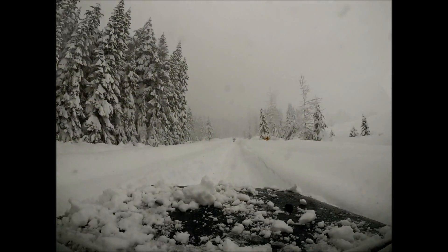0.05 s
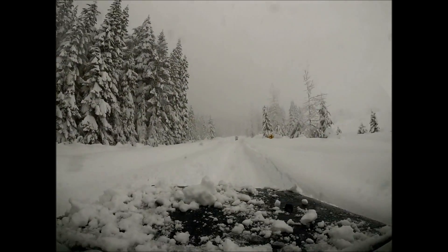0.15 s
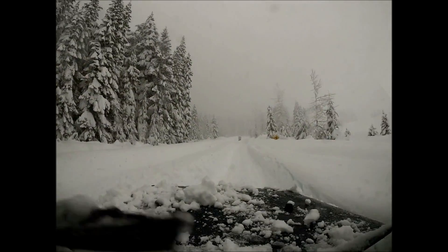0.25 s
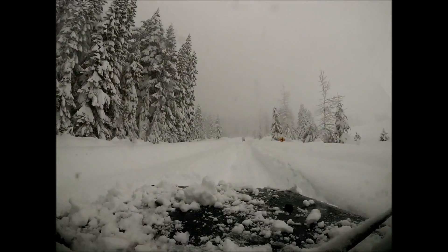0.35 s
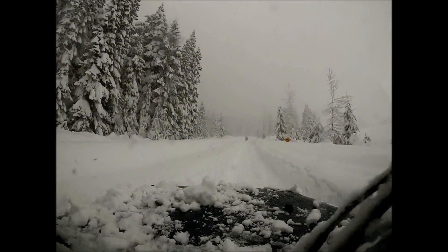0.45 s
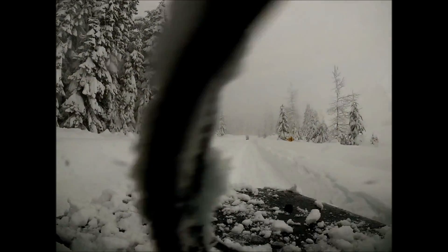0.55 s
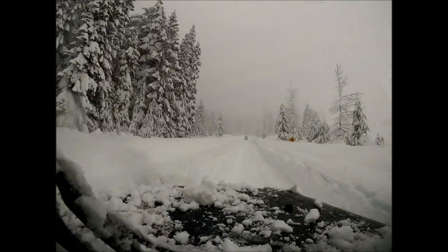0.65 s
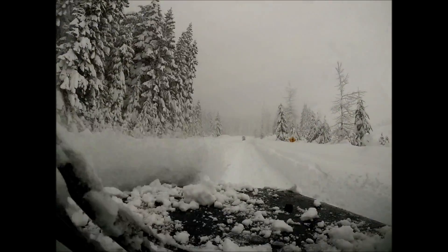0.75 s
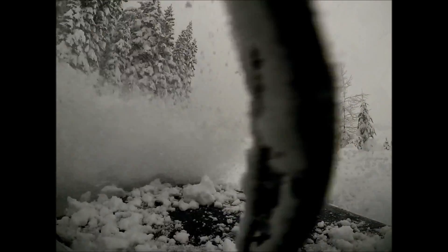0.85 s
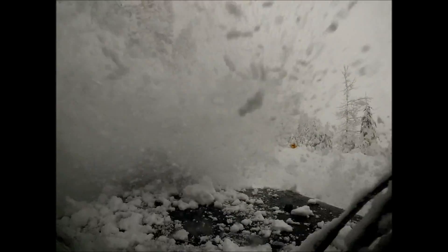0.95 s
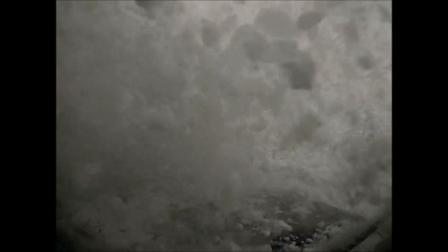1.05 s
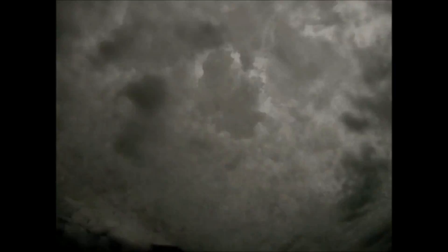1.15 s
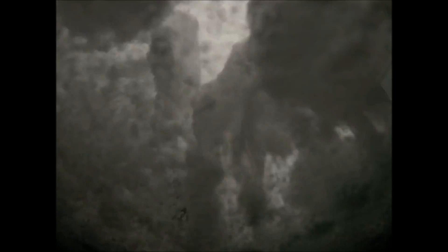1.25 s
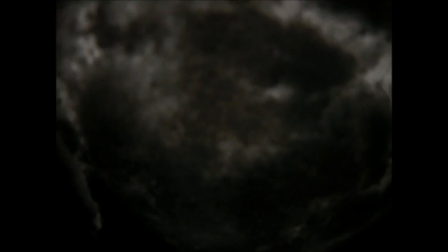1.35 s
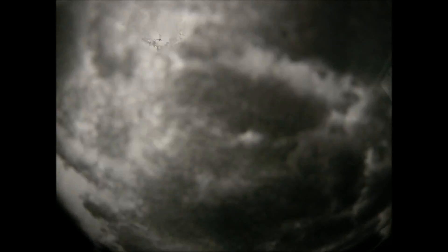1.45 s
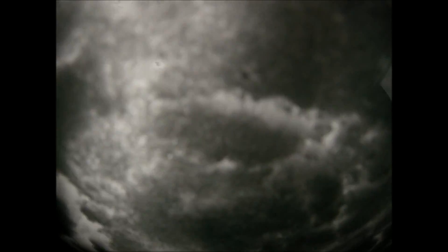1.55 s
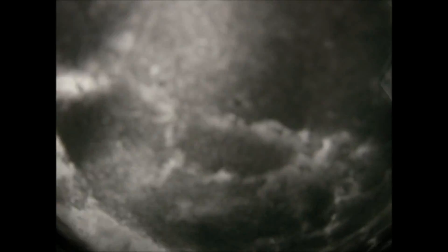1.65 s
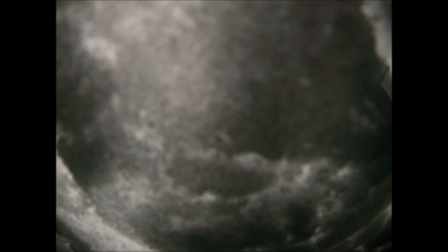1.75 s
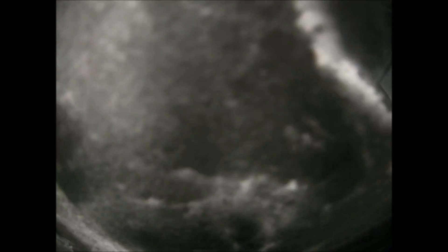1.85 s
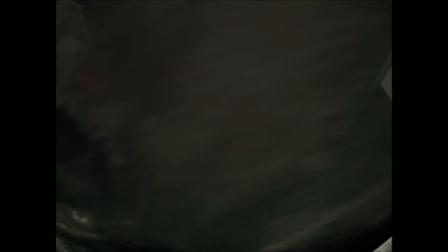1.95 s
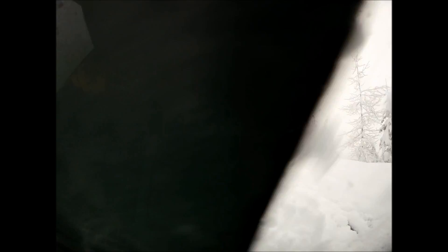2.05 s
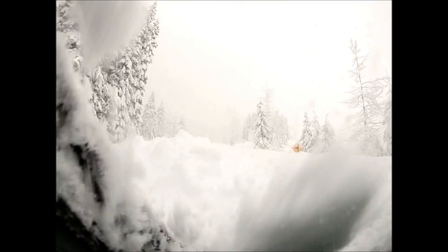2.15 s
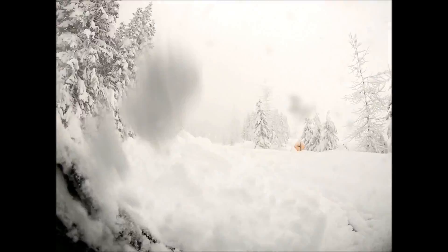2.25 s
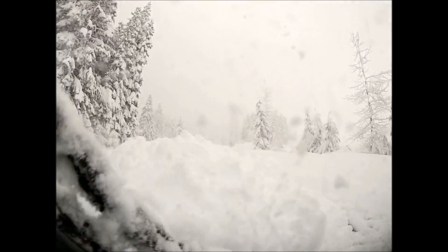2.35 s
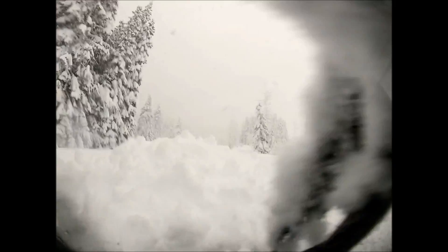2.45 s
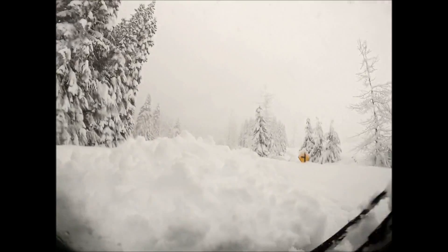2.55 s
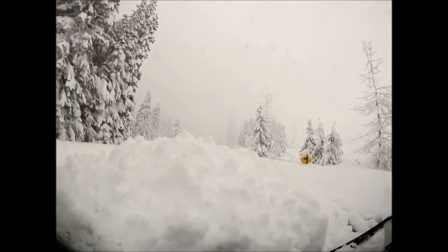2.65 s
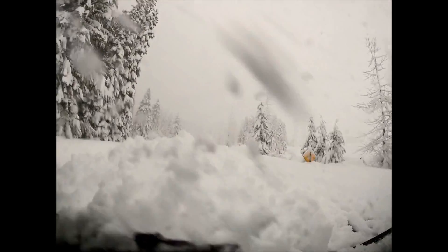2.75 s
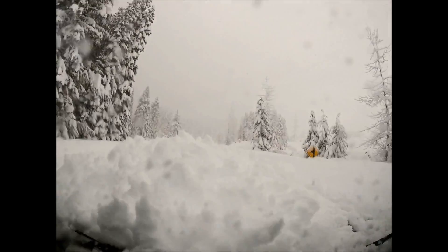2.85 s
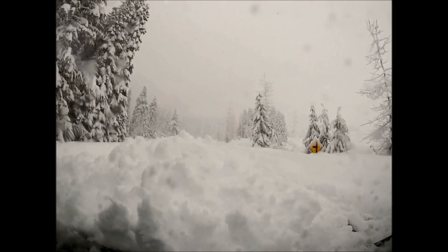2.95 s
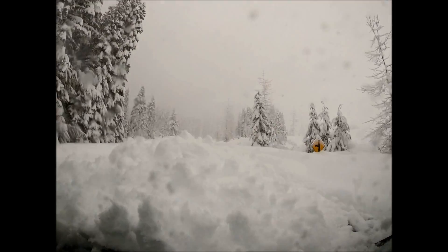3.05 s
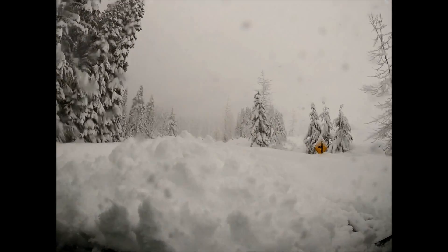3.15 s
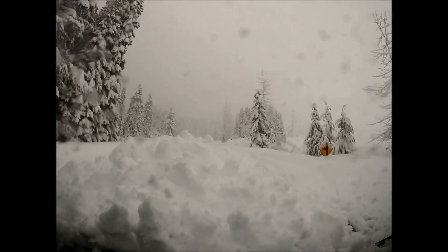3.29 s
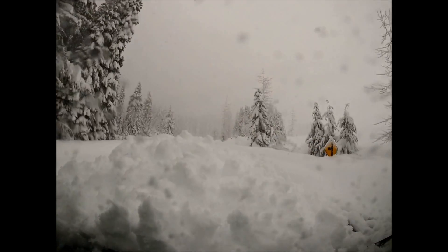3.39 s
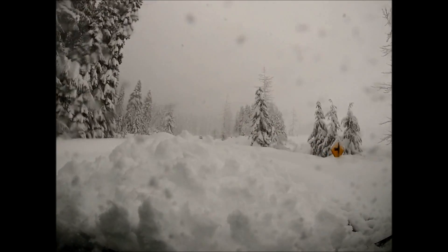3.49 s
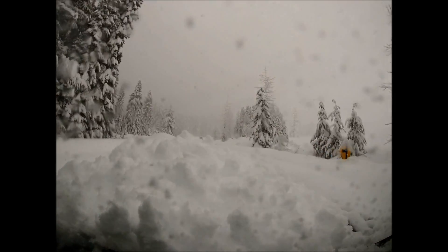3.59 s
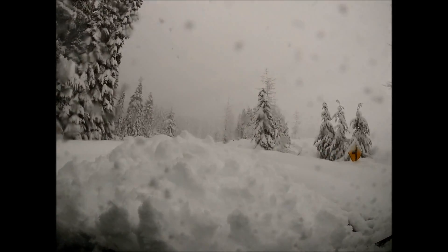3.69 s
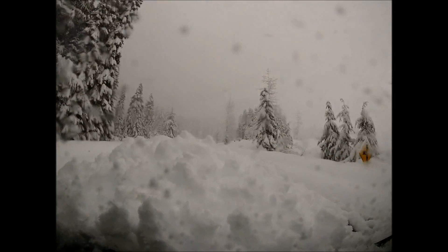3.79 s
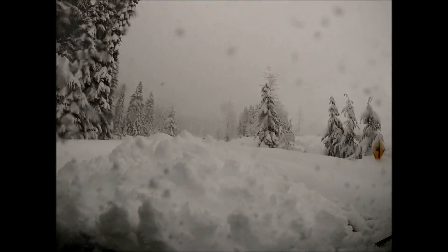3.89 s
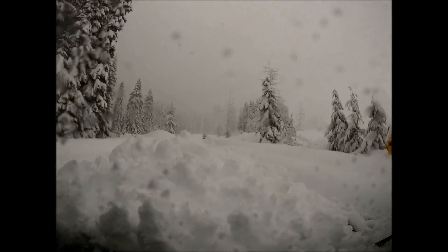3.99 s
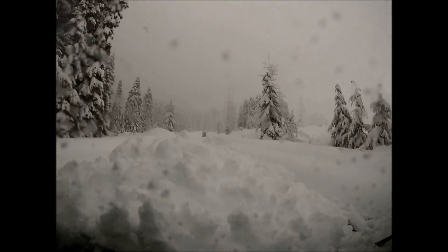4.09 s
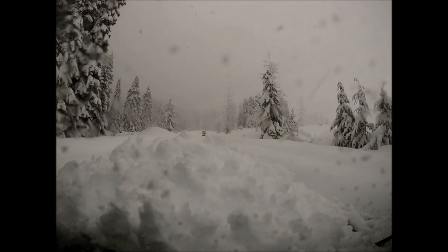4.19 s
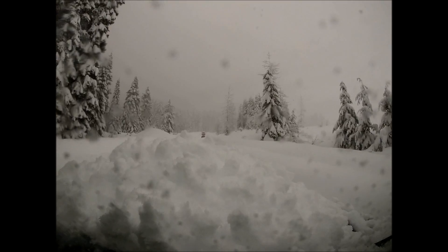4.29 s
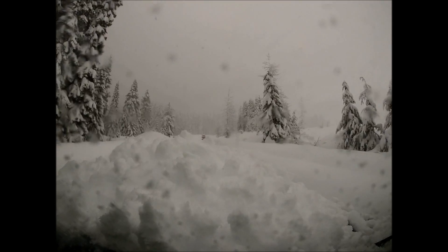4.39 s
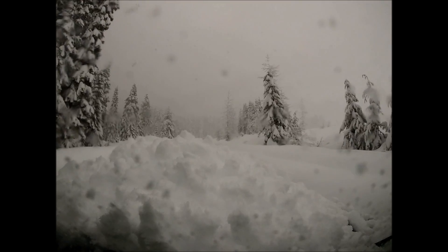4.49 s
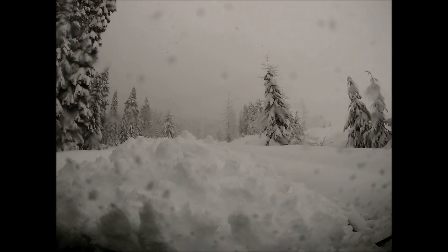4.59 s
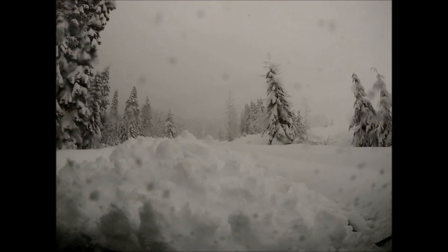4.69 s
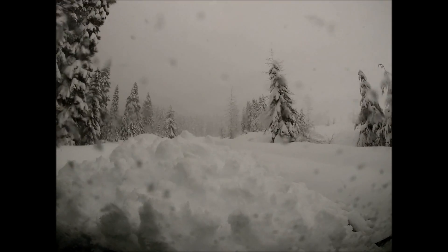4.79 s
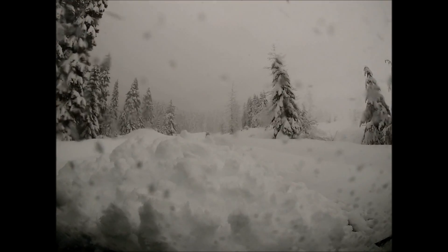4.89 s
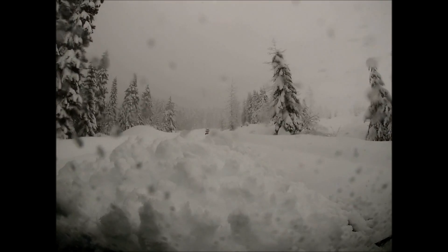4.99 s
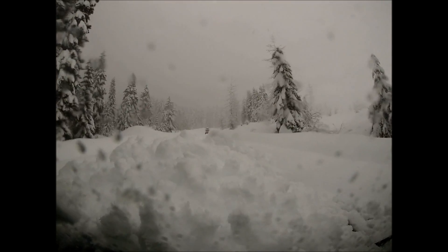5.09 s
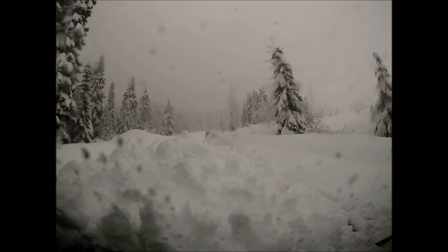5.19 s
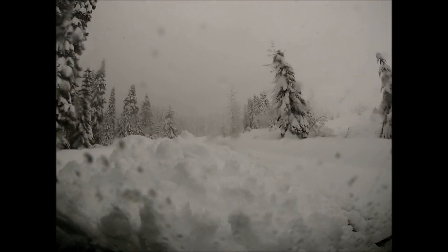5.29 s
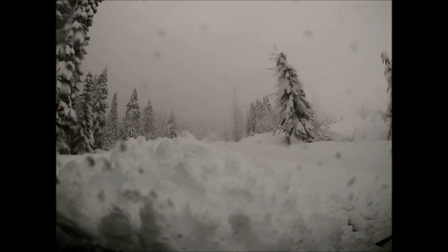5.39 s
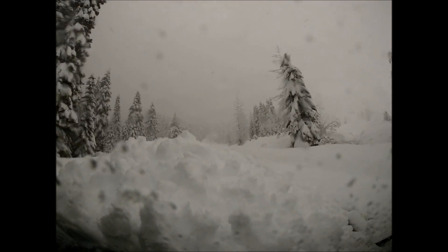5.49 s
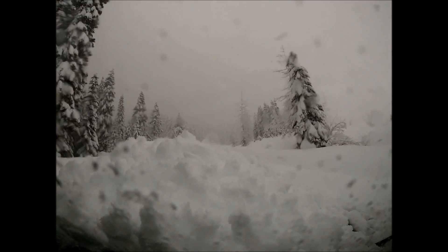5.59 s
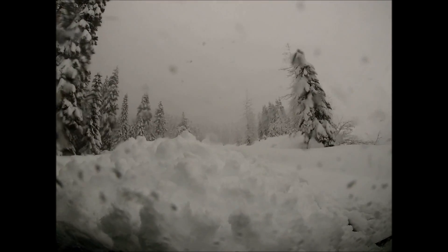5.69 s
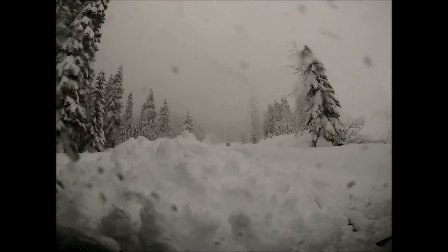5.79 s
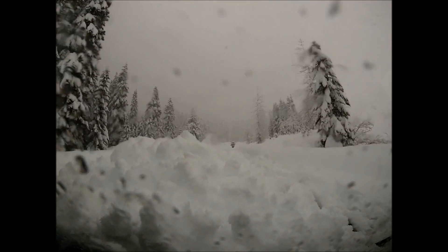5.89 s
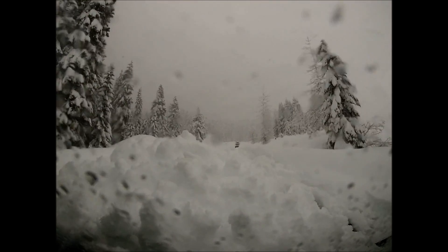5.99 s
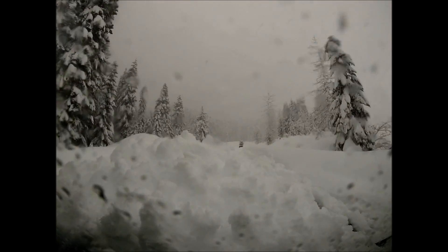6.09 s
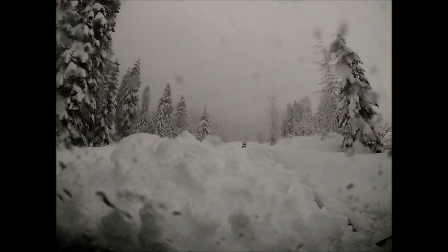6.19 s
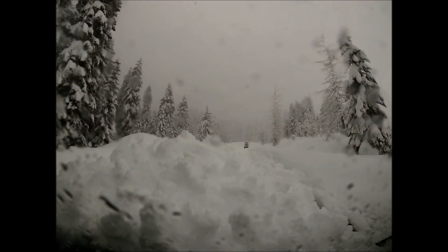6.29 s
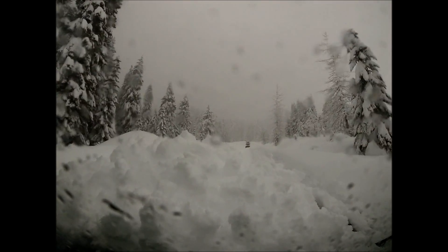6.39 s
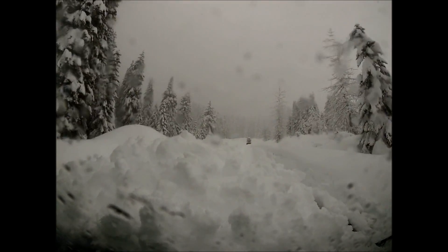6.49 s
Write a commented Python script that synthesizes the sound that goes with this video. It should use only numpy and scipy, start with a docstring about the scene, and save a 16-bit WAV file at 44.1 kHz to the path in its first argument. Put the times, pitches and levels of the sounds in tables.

```python
"""A vehicle ploughs through deep snow, heard from inside the cab.
From the start ruts drive the cab's air at a low pitch, snow scrapes shake the body, and the engine surges.
For three seconds filtered grains of snow spray the windscreen in waves, while icy lumps ring its modes.
Near 2 s the wiper moans by stick and slip; at 2.4 s a heavy clump excites the modes of the body.
From 3 s the gears whine faintly at multiples of the firing rate; lumps tick on over a muffled hiss of tyres."""
import sys
import numpy as np
from scipy import signal
from scipy.fft import rfft, irfft
from scipy.io import wavfile
from scipy.ndimage import uniform_filter1d

SR = 44100
rng = np.random.default_rng(int(sys.argv[2]) if len(sys.argv) > 2 else 0)


def put_to_file(sound):
    """Save the sound as 16-bit audio at rate SR, in the file named by the first command-line argument."""
    columns = np.atleast_2d(sound).T  # one column per channel
    safe = np.clip(columns, -1, 1)
    whole_steps = np.round(safe * 32767)
    wavfile.write(sys.argv[1], SR, whole_steps.astype(np.int16))


N = 288414
TIME = np.arange(N) / SR

# Levels are relative. In a swelling event t is when full level is reached, and length is the hold after it.
# ruts that set the cab booming: [t/s, length/s, level/dB]
RUTS = [(0, 0.0032, -5), (.075, 0.032, -8.5), (.205, 0.011, -8), (.3, 0.069, -13.5), (.57, 0.18, -9.5),
        (.89, 0.2, -7.5), (1.15, 0.46, -15.5), (1.37, 0.034, -7.5), (1.76, 0.18, -21), (2.24, 0.024, -10),
        (2.435, 0.21, -7.5), (2.75, 0.014, -14), (2.86, 0.055, -13), (2.99, 0.034, -12),
        (3.34, 0.03, -15.5), (3.5, 0.039, -29), (3.66, 0.17, -23), (3.96, 0.24, -17), (4.4, 0.11, -19),
        (4.58, 0.13, -17.5), (4.775, 0.06, -11), (4.88, 0.16, -17.5), (5.05, 0.034, -13.5),
        (5.25, 0.068, -17.5), (5.43, 0.098, -16), (5.52, 0.12, -16.5), (5.76, 0.022, -22),
        (5.92, 0.04, -16.5), (6.31, 0.18, -19)]
# pitch of the cab's boom: [t/s, f/Hz]
BOOM_PITCH = [(0, 45.7), (.4, 43.85), (.9, 46), (1.15, 44.94), (1.35, 48.8), (1.7, 48.77), (2.2, 46.19),
              (2.45, 50.63), (2.68, 44.67), (3, 47.27), (3.8, 45.65), (4.15, 44.1), (4.6, 45.65),
              (5.1, 44.92), (5.8, 43.91), (6.54, 45)]
# packed snow scraping along the underside: [t/s, length/s, floor pan level/dB, panels level/dB]
SCRAPES = [(0.042, 0.07, -28, -32), (0.216, 0.042, -21.5, -28.5), (0.667, 0.24, -25, -26.5),
           (1.262, 0.13, -16.5, -17.5), (1.43, 0.29, -27.5, -31.5), (2.163, 0.059, -22.5, -32),
           (2.289, 0.024, -17, -16), (2.434, 0.13, -20.5, -25.5), (2.882, 0.16, -19.5, -19),
           (3.107, 0.28, -41, -37), (4.367, 0.12, -32, -44), (5.125, 0.074, -29, -48),
           (5.323, 0.063, -37, -28.5), (5.526, 0.086, -26.5, -52), (6.05, 0.24, -29, -40),
           (6.38, 0.14, -54, -34)]
# drag of the snow, which eases once the deep drift is passed: [t/s, level/dB]
DRAG = [(0, 3.5), (1.7, 1.5), (3.1, -2), (4.4, -4.5), (5, -4), (6.54, -8.5)]
# spectrum of the floor pan: [f/Hz, level per Hz/dB]
PAN_SPECTRUM = [(15, -4.5), (26, -1.5), (45, -18), (64, -0.5), (85, -4), (110, -11), (135, -16),
                (170, -17.5), (300, -45)]
# spectrum of the body panels: [f/Hz, level per Hz/dB]
PANEL_SPECTRUM = [(90, -22.5), (135, -9.5), (160, -3), (184, 8), (205, -3.5), (228, -11), (300, -24.5),
                  (420, -36), (900, -57)]
# engine speed: [t/s, firing rate f/Hz]
FIRING_RATE = [(0, 60.7), (.2, 62), (.4, 64.5), (.52, 63), (.7, 66.7), (1.05, 60.8), (1.7, 60.5),
               (1.95, 67.5), (2.15, 59.5), (2.3, 59), (2.72, 63.8), (3.1, 59.9), (3.2, 61.9), (3.3, 63.4),
               (3.4, 67.5), (3.47, 70.1), (3.55, 71.3), (3.65, 70.7), (3.75, 69), (3.82, 67.3), (4.02, 62),
               (4.25, 63), (4.37, 66), (4.45, 66.7), (4.52, 65.6), (4.62, 61.5), (4.8, 59), (5.2, 58),
               (5.4, 63), (5.72, 67.1), (6.1, 62.7), (6.54, 61)]
# level of the engine drone: [t/s, level/dB]
EFFORT = [(0, -31.5), (.7, -28.5), (1.6, -33.5), (2, -37), (2.8, -38.5), (3.3, -31.5), (3.55, -37),
          (3.97, -29.5), (4.25, -45.5), (4.6, -32.5), (5, -44), (6.54, -50)]
# partials of the drone: [multiple of the firing rate, level/dB]
DRONE = [(2, -12), (3, 6.5), (4, -18)]
# low engine orders that swell in the cab: [t/s, length/s, multiple of the firing rate, level/dB]
HUMS = [(.08, .17, 1.25, -25), (.36, .32, 1.5, -31.5), (0.72, 0.2, 2.22, -29.5), (1.99, 0.23, 1.5, -25),
        (3.14, 0.33, 1.4, -29), (3.46, 0.26, 2, -34), (4.2, 0.45, 2, -41), (5.3, 0.76, 2.12, -41.5)]
# gears whining under load: [t/s, length/s, multiple of the firing rate, level/dB]
WHINES = [(3.11, 0.28, 11.35, -52), (3.1, 0.2, 12.7, -57), (3.4, 0.41, 13.4, -50.5), (3.62, .11, 15.8, -60),
          (4.37, 0.15, 11.35, -53), (4.39, .11, 13.4, -53.5)]
# gears hissing in their housing: [t/s, length/s, level/dB]
GEAR_HISS = [(.45, 0.43, -49), (3.06, 0.29, -50.5), (3.4, 0.49, -53), (4.35, .16, -51)]
# spectrum of the gear hiss: [f/Hz, level per Hz/dB]
HOUSING_SPECTRUM = [(550, -2), (620, -15), (700, 3), (755, 3), (795, -2.5), (850, -4), (920, 3.5), (960, 1),
                    (1020, -9), (1130, -5)]
# packed lumps knocking on the body: [t/s, level/dB, tilt/(dB per octave), crumbling time/s]
KNOCKS = [(.2, -35.5, -10, .006), (.69, -38, -9, .012), (1.185, -33, 0, .005), (1.305, -36, -12, .006),
          (1.344, -30, -16, .006), (1.37, -34, -8, .002), (2.408, -25, -2, .007), (2.4135, -21.5, 3, 0.007),
          (2.427, -30, 0, .004), (2.449, -43, 0, .004), (2.523, -41, -8, .005), (2.968, -29.5, -8, .006),
          (4.604, -38, 0, 0.004)]
# modes of the body around the windscreen: [f/Hz, level/dB, t60/s]
COWL_MODES = [(298, -5, 0.061), (554, 3, 0.041), (687, -3.5, 0.044), (845, -1.5, 0.052), (968, -3.5, 0.032),
              (1180, -3, 0.032), (1388, -3, 0.038), (1514, -14, 0.022)]
# spectrum of a lump bursting on the body: [f/Hz, level per Hz/dB]
THUD_SPECTRUM = [(200, -15.5), (400, -12.5), (560, -1), (900, 0), (1200, -7), (1400, -0.5), (1700, -17.5),
                 (3000, -27)]
# icy lumps on the glass: [t/s, ring level/dB, crunch level/dB, ring pitch f/Hz]
TICKS = [(0.202, -24, -44.5, 1866), (0.2976, -21.5, -50.5, 1840), (0.4127, -33, -45, 1900),
         (0.5044, -20, -48.5, 1860), (0.572, -19.5, -47.5, 1870), (0.635, -21, -48.5, 1840),
         (2.398, -31, -57.5, 1922), (2.506, -35.5, -71, 1920), (2.5295, -29, -73, 1910),
         (2.9321, -21, -70, 1912), (3.0512, -27, -55, 1840), (3.31, -34, -68, 1826),
         (3.348, -35.5, -71, 1830), (4.077, -32.5, -57, 1890), (4.1458, -30.5, -54, 1895),
         (4.1662, -29, -78, 1900), (4.2244, -28.5, -53.5, 1920), (4.379, -32, -60, 1880),
         (4.586, -35.5, -70, 1840), (4.6035, -20.5, -73, 1820), (5.064, -40, -70, 1840),
         (5.0941, -28, -62, 1822), (5.141, -36, -63, 2015), (5.1535, -21, -48.5, 1850),
         (5.205, -28.5, -51, 2020), (5.474, -36.5, -66, 1992), (5.621, -32, -56, 1880),
         (5.9566, -33.5, -55, 1920), (6.0183, -25, -54, 1864), (6.077, -25.5, -51, 1880),
         (6.1487, -23.5, -51.5, 1846), (6.308, -31, -59, 1878), (6.4373, -31.5, -62, 1830),
         (6.5017, -30, -64, 1835)]
# modes of the windscreen: [f/Hz, level/dB, t60/s]
GLASS_MODES = [(565, -28, 0.066), (820, -15.5, 0.038), (1090, -21, 0.066), (1478, -15, 0.039),
               (1862, 0.5, 0.026), (2010, -14, 0.05), (2515, -11, 0.023), (2720, -22, 0.0031),
               (3650, -26, 0.011)]
# spectrum of crumbling ice: [f/Hz, level per Hz/dB]
CRUMB_SPECTRUM = [(500, -18), (1200, -14.5), (3000, 7), (4200, -3.5), (6100, -6.5), (7200, -13.5),
                  (9000, -20.5), (11000, -23), (15000, -35)]
# soft clumps landing: [t/s, slap level/dB, time to peak/s]
CLUMPS = [(0.04, -34.5, 0.0073), (0.083, -39, 0.0045), (0.191, -36.5, 0.0086), (0.692, -38, 0.0094),
          (0.984, -33, .005), (1.046, -31, .003), (1.115, -39, 0.0046), (1.124, -29, .007),
          (1.179, -33.5, 0.014), (1.185, -27.5, 0.0058), (1.266, -25, 0.0025), (1.304, -30.5, 0.0036),
          (1.328, -27.5, 0.015), (1.365, -23, 0.004), (2.225, -33, 0.01), (2.277, -37, 0.0052),
          (2.402, -26.5, 0.007), (2.911, -35, 0.0092), (2.962, -30.5, 0.0078)]
# spectrum of the slap: [f/Hz, level per Hz/dB]
SLAP_SPECTRUM = [(300, -11), (560, -2.5), (850, -2.5), (1300, -12.5), (1650, 3), (2000, 4.5), (2500, 0),
                 (3200, -16), (6000, -20), (10000, -53), (15000, -65)]
# waves of snow over the windscreen: [t/s, length/s, level/dB, growth/(dB per s)]
WAVES = [(.045, 0.049, -41.5, -22), (.68, 0.1, -46.5, -4), (.86, 0.11, -42.5, 7), (.99, 0.21, -36.5, 8.5),
         (1.125, 0.27, -35, 7), (1.408, 0.12, -38.5, -75), (1.62, 0.62, -46, 14), (2.11, 0.061, -46, -2),
         (2.21, 0.033, -48, -3), (2.285, 0.032, -36, 8), (2.405, 0.11, -40.5, -59), (2.725, 0.22, -39.5, 5),
         (2.985, 0.025, -38, -200)]
# spectrum of the spray: [f/Hz, level per Hz/dB]
SPRAY_SPECTRUM = [(120, -21.5), (290, -12), (410, -10.5), (600, -10), (1000, -10), (1300, -6), (2000, -1),
                  (2700, -3.5), (3000, -9), (3300, -18.5), (4400, -24), (5900, -25.5), (7500, -38.5),
                  (9000, -41.5), (10500, -52.5), (13500, -50.5), (15000, -60)]
# spectrum of wet snow landing: [f/Hz, level per Hz/dB]
SLUSH_SPECTRUM = [(150, -4), (300, 10.5), (420, -10), (570, -5), (680, -12.5), (830, 4), (1000, -12),
                  (1250, -9.5), (1600, -1.5), (2200, -11.5), (3000, -32)]
# resonances of glass and cab that colour the snow: [f/Hz, width/Hz, lift/dB]
CAB_RESONANCES = [(543.5, 90, 10.5), (787, 240, 9.5), (1216, 84, 5), (1449, 68, 8), (1917, 290, 7),
                  (2420, 39, 9), (3038, 58, 6.5), (3794, 170, 8.5), (4310, 89, 10), (4700, 98, 7.5),
                  (4984, 260, 9), (5975, 430, 11), (6900, 350, 6.5), (7500, 510, 4), (8220, 470, 8),
                  (8700, 340, 8.5), (9650, 990, 5.5)]
# heavy wet snow pelting the glass within the waves: [t/s, length/s, level/dB]
PELTS = [(.97, 0.11, -45.5), (1.115, 0.23, -36.5), (2.1, 0.072, -47), (2.215, .095, -44.5),
         (2.87, 0.07, -39.5)]
# wiper rubber on wet glass: [t/s, length/s, f/Hz, glide/(Hz per s), fundamental level/dB, overtones level/dB]
WIPER = [(2.092, 0.055, 518, -1000, -41, -40.5), (2.138, 0.066, 475, 99, -49, -36.5),
         (2.205, 0.059, 543, 150, -33, -38), (2.232, 0.033, 450, 250, -49, -33.5),
         (2.296, 0.033, 520, 100, -35, -41)]
# overtones of the blade: [multiple of the fundamental, level/dB]
RASP = [(2, -7), (3, -2.5), (4, 0.5), (5, -15)]
# thin chirps of the wiper blade: [t/s, f/Hz, peak level/dB, length/s]
SQUEAKS = [(.006, 5640, -51, 0.019), (0.833, 5990, -44, 0.0097)]
# bright crackles of ice: [t/s, level/dB, time to peak/s, centre f/Hz]
CRACKLES = [(1.393, -55, .002, 8500), (2.294, -71, 0.0062, 7000), (2.622, -62, 0.0055, 7180),
            (2.736, -52, 0.015, 4600), (2.967, -51, .007, 5000), (5.809, -61, 0.0033, 9070)]
# spectrum of the tyre hiss: [f/Hz, level per Hz/dB]
TYRE_SPECTRUM = [(120, -0.5), (280, 11), (430, 0.5), (750, -1.5), (1100, -2), (1450, -1.5), (2000, -3),
                 (2900, -4.5), (3700, -11), (4200, -19), (5200, -20.5), (6700, -26.5), (8500, -33.5),
                 (11000, -31.5), (15000, -48.5)]

RING_HZ = 1862  # pitch at which the windscreen's modes are listed
DRIFT_END_S = 3.02  # fine snow sifts over the glass until here, then dies away
CEILING = .9  # largest swing after rounding off
EDGE_HZ = 15400  # upper band limit


def amp(db):
    """Definition of the decibel: level to amplitude ratio."""
    return 10 ** (np.asarray(db) / 20)


def unit(x):
    """Normalisation to an rms of 1."""
    return x / np.sqrt(np.mean(x ** 2) + 1e-20)


def curves(rows):
    """Linear interpolation: each column of a table as a curve over the whole scene."""
    t, *columns = np.transpose(rows)
    return [np.interp(TIME, t, column) for column in columns]


def add(mix, s, sound):
    """Superposition of a sound on the mix, in place, from time s."""
    part = mix[max(round(s * SR), 0):][:len(sound)]
    part += sound[:len(part)]


def colour(x, points, peaks=()):
    """Linear filtering by a smooth spectrum with resonances standing on it; rms 1."""
    hz = np.fft.rfftfreq(len(x), 1 / SR)
    f, db = np.transpose(points)
    shape_db = np.interp(np.log(hz + 1), np.log(f), db)
    # further fall of 24 dB per octave above the last point
    shape_db -= 24 * np.log2(np.maximum(hz / f[-1], 1))
    for centre, width, lift in peaks:
        shape_db += lift / (1 + (2 * (hz - centre) / width) ** 2)
    return unit(irfft(rfft(x) * amp(shape_db), len(x)))


def wander(rate_hz):
    """Low-passed Gaussian noise: a chance variation of rms 1, slower than about the given rate."""
    hz = np.fft.rfftfreq(N, 1 / SR)
    spectrum = rfft(rng.standard_normal(N)) * np.exp(-(hz / rate_hz) ** 2)
    return unit(irfft(spectrum, N))


def steadied(x, span_s):
    """Division by the running rms: removes swells slower than the span, so a level curve governs them."""
    size = max(int(span_s * SR), 2)
    power = uniform_filter1d(uniform_filter1d(x ** 2, size), size)
    return x / np.sqrt(power + 1e-9)


def angle_of(hz):
    """Phase as the time integral of a moving frequency."""
    return 2 * np.pi * np.cumsum(hz) / SR


def grains(per_s, spread_db):
    """Impulse noise: impacts of random sign and time, their sizes scattered by an exponential law in dB."""
    size = amp(spread_db * np.minimum(rng.exponential(1, N), 4))
    struck = rng.random(N) < per_s / SR
    return unit(size * rng.choice([-1, 1], N) * struck)


def swells(rows, attack_s, release_s):
    """Addition of powers of overlapping events: each rises up to t, holds or grows, and decays exponentially."""
    power = np.zeros(N)
    for s, length, db, *growth in rows:
        t = TIME - s
        rise = np.clip(1 + t / attack_s, 0, 1)
        hold = amp(db + sum(growth) * np.clip(t, 0, length))
        fall = np.exp(-np.maximum(t - length, 0) / release_s)
        power += (rise * hold * fall) ** 2
    return np.sqrt(power)


def squash(t, peak_s):
    """Contact force of a lump as it flattens: a smooth rise to 1 and a longer fall."""
    return (t / peak_s * np.exp(1 - t / peak_s)) ** 2


def boom(level_db=-1, idle_db=-25.5, idle_swing_db=4, attack_s=0.039, release_s=.025,
         waver=0.02473, flutter_db=2.0):
    """Forced cavity resonance: the ruts keep the air of the cab swinging at one unsteady low pitch."""
    pitch_hz, = curves(BOOM_PITCH)
    pitch_hz = pitch_hz * (1 + waver * wander(16))
    idle = amp(idle_db + idle_swing_db * wander(2.5))
    gain = np.hypot(swells(RUTS, attack_s, release_s), idle)
    flutter = amp(level_db + flutter_db * wander(26))
    return gain * flutter * unit(np.sin(angle_of(pitch_hz)))


def rumble(pan_db=1.0, panels_db=-1.5, pan_idle_db=-26, panels_idle_db=-33,
           attack_s=0.041, release_s=0.012, lumpy_db=2):
    """Friction-excited vibration: packed snow scrapes under the floor pan and shakes the body panels."""
    drag_db, = curves(DRAG)
    scrapes = np.array(SCRAPES)
    pan_rows, panel_rows = scrapes[:, :3], np.delete(scrapes, 2, axis=1)
    pan_idle = amp(drag_db + pan_idle_db + lumpy_db * wander(4.4))
    panel_idle = amp(drag_db + panels_idle_db + lumpy_db * wander(17))
    pan_gain = np.hypot(swells(pan_rows, attack_s, release_s), pan_idle)
    panel_gain = np.hypot(swells(panel_rows, attack_s, release_s), panel_idle)
    low = steadied(colour(rng.standard_normal(N), PAN_SPECTRUM), 0.044)
    high = steadied(colour(rng.standard_normal(N), PANEL_SPECTRUM), 0.071)
    return amp(pan_db) * pan_gain * low + amp(panels_db) * panel_gain * high


def engine(jitter=.004, chatter=.006, drone_rough_db=3, hum_rough_db=1.5, whine_rough_db=4.5,
           hiss_idle_db=-70, attack_s=0.044, release_s=0.05):
    """Order synthesis: firing orders and thin gear tones follow one engine speed; gears hiss in their housing."""
    (firing_hz,), (drone_db,) = curves(FIRING_RATE), curves(EFFORT)
    angle = angle_of(firing_hz * (1 + jitter * wander(27)))
    gear_angle = angle + angle_of(firing_hz * chatter * wander(140))
    drone = sum(amp(db + drone_rough_db * wander(25)) * np.sin(k * angle) for k, db in DRONE)
    out = amp(drone_db) * unit(drone)
    for table, turn, rough_db in (HUMS, angle, hum_rough_db), (WHINES, gear_angle, whine_rough_db):
        flutter = amp(rough_db * wander(36))
        for s, length, k, db in table:
            tone = unit(flutter * np.sin(k * turn))
            out += swells([(s, length, db)], attack_s, release_s) * tone
    hiss_gain = np.hypot(swells(GEAR_HISS, attack_s, release_s), amp(hiss_idle_db))
    return out + hiss_gain * colour(rng.standard_normal(N), HOUSING_SPECTRUM)


def knocks(crumble_db=-4, rise_s=0.001, thud_db=-3, thud_s=0.0024):
    """Modal excitation: a packed lump pushes the body once and bursts with a thud; its pieces tumble after it."""
    t, out = np.arange(SR // 10) / SR, np.zeros(N)
    hz, db, t60 = np.transpose(COWL_MODES)[:, :, None]
    for s, knock_db, tilt_db, crumble_s in KNOCKS:
        decay = amp(db + tilt_db * np.log2(hz / hz[0]) - 60 * t / t60)
        modes = decay * np.sin(2 * np.pi * (hz * t + rng.random(hz.shape)))
        ring = modes.sum(0) * (1 - np.exp(-t / rise_s))
        pieces = rng.standard_normal(len(t)) * np.exp(-t / crumble_s)
        pieces /= np.linalg.norm(pieces)
        # every piece sets the same modes ringing again
        knock = ring + amp(crumble_db) * signal.fftconvolve(ring, pieces)[:len(t)]
        thud = amp(thud_db) * squash(t, thud_s) * colour(rng.standard_normal(len(t)), THUD_SPECTRUM)
        add(out, s, amp(knock_db) * (knock / knock[:SR // 80].std() + thud))
    return out


def ticks(ring_db=-1, crunch_db=2, crunch_s=.009, crunch_rise_s=0.00031, ring_rise_s=0.00097,
          scatter_db=2.5, detune=0.0045, patter_db=-62, flecks_db=-67):
    """Damped free vibration: each icy lump rings the glass briefly and crumbles; tiny ones patter throughout."""
    t = np.arange(SR // 16) / SR
    hz, db, t60 = np.transpose(GLASS_MODES)[:, :, None]
    decay = amp(db - 60 * t / t60) * (1 - np.exp(-t / ring_rise_s))
    plain_ring = (decay * np.sin(2 * np.pi * hz * t)).sum(0)
    flecks = signal.oaconvolve(grains(per_s=4.0, spread_db=-2.0), plain_ring)[:N]
    patter = colour(grains(per_s=69, spread_db=0.0), SPRAY_SPECTRUM, CAB_RESONANCES)
    out = amp(patter_db) * patter + amp(flecks_db) * unit(flecks)
    for s, peak_db, crumb_db, pitch_hz in TICKS:
        # each lump hits another spot, with its own pitch and blend of modes
        strength = amp(scatter_db * rng.standard_normal(hz.shape))
        load = pitch_hz / RING_HZ + detune * rng.standard_normal(hz.shape)
        ring = (strength * decay * np.sin(2 * np.pi * hz * load * t)).sum(0)
        add(out, s, amp(peak_db + ring_db) * ring / abs(ring).max())
        crumbs = colour(rng.standard_normal(len(t)), CRUMB_SPECTRUM, CAB_RESONANCES)
        crunch = crumbs * np.exp(-t / crunch_s) * (1 - np.exp(-t / crunch_rise_s))
        add(out, s, amp(crumb_db + crunch_db) * crunch)
    return out


def clumps(level_db=-1):
    """Inelastic impact: soft snow flattens on the glass with a slap of noise shaped by the contact force."""
    t, out = np.arange(SR // 10) / SR, np.zeros(N)
    for s, db, peak_s in CLUMPS:
        slap = squash(t, peak_s) * colour(rng.standard_normal(len(t)), SLAP_SPECTRUM)
        add(out, s, amp(db + level_db) * slap)
    return out


def spray(sifting_db=-46, thinning_db_per_s=-2.5, attack_s=0.038, release_s=0.0039,
          powder_db=-5, grit_db=-7, clumping_db=0.6, slush_db=-11):
    """Random impact noise: grains, coarse grit and fine powder sweep the windscreen, with soft slush among them."""
    sifting = (0, DRIFT_END_S, sifting_db, thinning_db_per_s)
    gain = swells(WAVES + [sifting], attack_s, release_s)
    grit = amp(grit_db) * grains(per_s=240, spread_db=4.0)
    powder = amp(powder_db) * rng.standard_normal(N)
    drive = grains(per_s=3600, spread_db=1.0) + grit + powder
    slush = colour(grains(per_s=180, spread_db=0.5), SLUSH_SPECTRUM, CAB_RESONANCES)
    snow = colour(drive, SPRAY_SPECTRUM, CAB_RESONANCES) + amp(slush_db) * slush
    return gain * amp(clumping_db * wander(58)) * snow


def pelts(attack_s=0.012, release_s=0.003, splash_db=-5, bunching_db=2):
    """Modulated impulse noise: separate wet lumps land in quick bunches, each with a dull pat and a splash."""
    lumps = grains(per_s=250, spread_db=-0.5) * unit(amp(bunching_db * wander(70)))
    pat = colour(lumps, SLUSH_SPECTRUM, CAB_RESONANCES)
    splash = amp(splash_db) * colour(lumps, SPRAY_SPECTRUM, CAB_RESONANCES)
    return swells(PELTS, attack_s, release_s) * (pat + splash)


def wiper(arch=0.028, jitter=0.026):
    """Stick-slip friction: the loaded blade gives short, rasping moans, pitch and level arching with pressure."""
    out = np.zeros(N)
    for s, length, hz, glide, low_db, rasp_db in WIPER:
        t = np.arange(0, length, 1 / SR)
        pressure = np.sin(np.pi * t / length)
        bend = 1 + arch * pressure + jitter * wander(130)[:len(t)]
        angle = angle_of((hz + glide * t) * bend)
        fundamental = amp(low_db) * unit(np.sin(angle))
        overtones = unit(sum(amp(db) * np.sin(k * angle) for k, db in RASP))
        add(out, s, pressure * (fundamental + amp(rasp_db) * overtones))
    return out


def squeaks(jitter=0.015):
    """Frictional self-oscillation: the rubber edge chirps faintly at one jittered pitch as it skids."""
    out = np.zeros(N)
    for s, hz, db, length in SQUEAKS:
        size = int(length * SR)
        angle = angle_of(hz * (1 + jitter * wander(460)[:size]))
        add(out, s, amp(db) * np.hanning(size) * np.sin(angle))
    return out


def crackles(skirt_db=-22, grit_db=4):
    """Band-limited noise of uneven impacts: dry ice crystals skitter over the glass in thin, bright bursts."""
    t, out = np.arange(SR // 10) / SR, np.zeros(N)
    for s, db, peak_s, hz in CRACKLES:
        crystals = rng.standard_normal(len(t)) * amp(grit_db * rng.standard_normal(len(t)))
        band = [(hz / 20, 2 * skirt_db), (hz / 2, skirt_db / 2), (hz, 0), (hz * 2, skirt_db)]
        add(out, s, amp(db) * squash(t, peak_s) * colour(crystals, band, CAB_RESONANCES))
    return out


def tyres(level_db=-47.0, cab_share=0.48, flicker_db=0.5, swell_db=.5):
    """Broadband noise through weakened resonances: a nearly steady, muffled hiss of churned snow."""
    peaks = [(hz, width, cab_share * lift) for hz, width, lift in CAB_RESONANCES]
    gain = amp(level_db + swell_db * wander(2.2) + flicker_db * wander(30))
    return gain * colour(rng.standard_normal(N), TYRE_SPECTRUM, peaks)


def scene():
    """Linear superposition of all sources in the cab, as one channel."""
    vehicle = boom() + rumble() + engine()
    snow = knocks() + ticks() + clumps() + spray() + pelts() + crackles()
    blade = wiper() + squeaks()
    return (vehicle + snow + blade + tyres())[None]


def record(dry):
    """Soft saturation of the largest swings, then a low-pass band limit and softened ends."""
    rounded = dry / (1 + (dry / CEILING) ** 8) ** (1 / 8)
    lowpass = signal.firwin(511, EDGE_HZ, window=("kaiser", 9), fs=SR)[None]
    limited = signal.oaconvolve(rounded, lowpass, "same")
    return limited * signal.windows.tukey(N, .001)


dry = scene()
out = record(dry)
put_to_file(out)
```